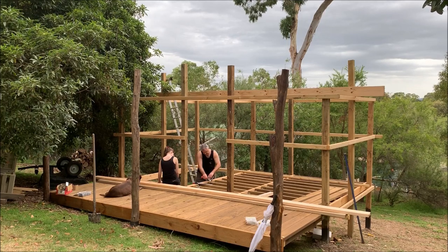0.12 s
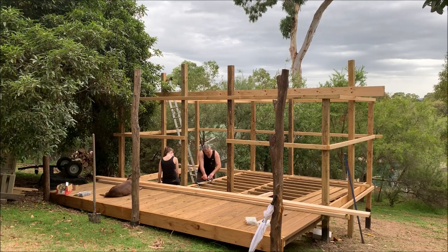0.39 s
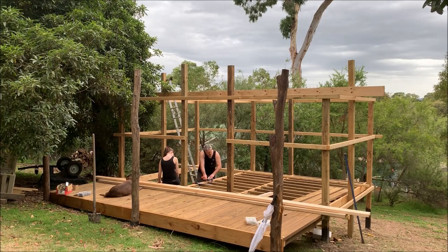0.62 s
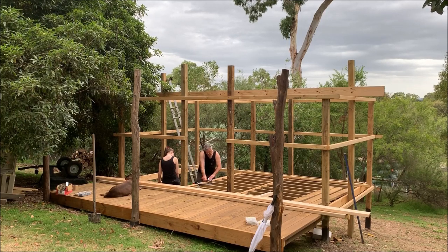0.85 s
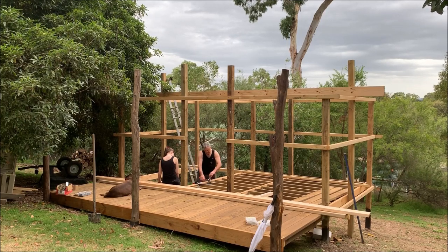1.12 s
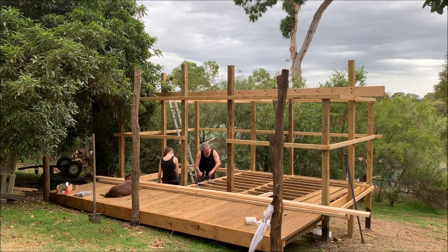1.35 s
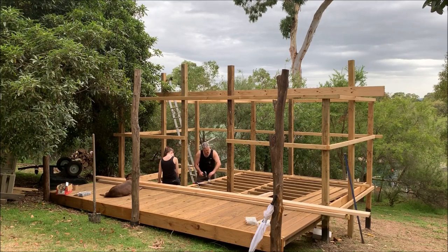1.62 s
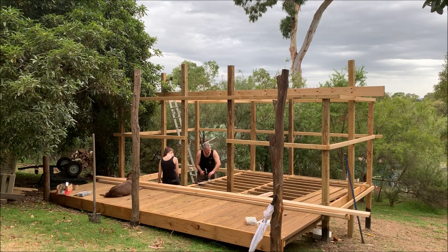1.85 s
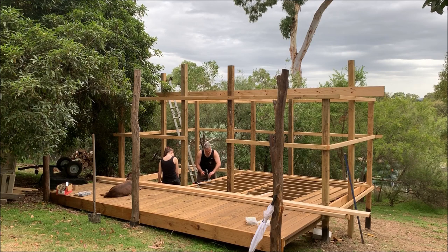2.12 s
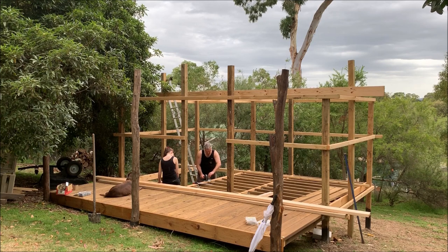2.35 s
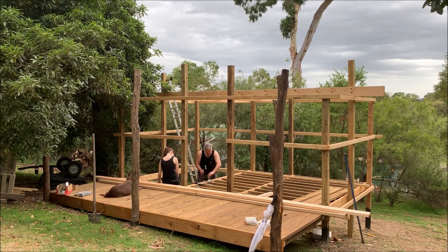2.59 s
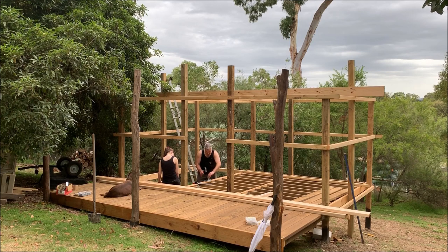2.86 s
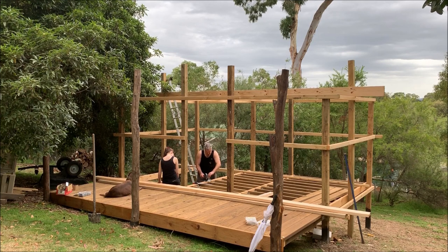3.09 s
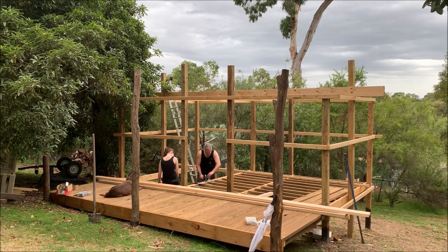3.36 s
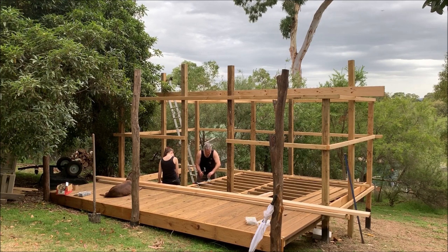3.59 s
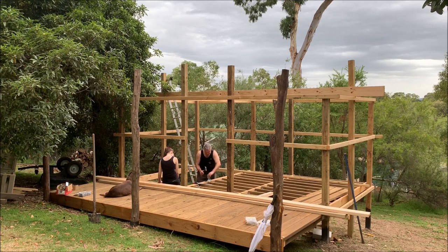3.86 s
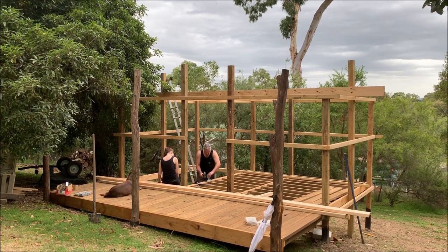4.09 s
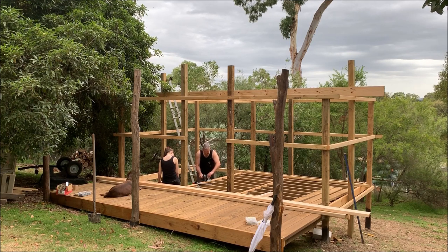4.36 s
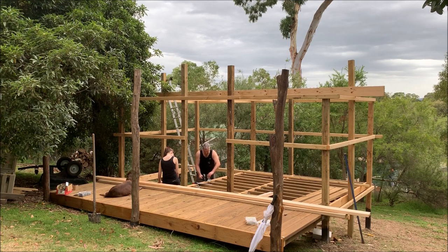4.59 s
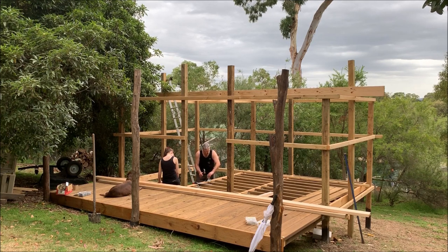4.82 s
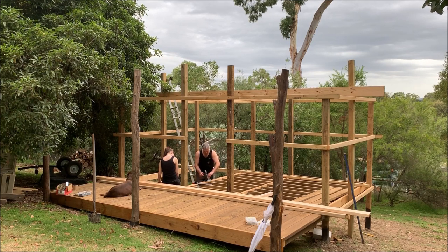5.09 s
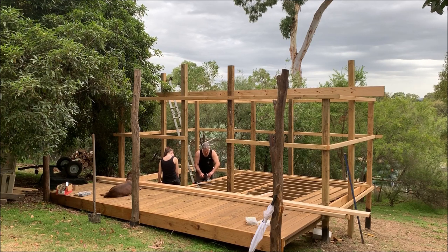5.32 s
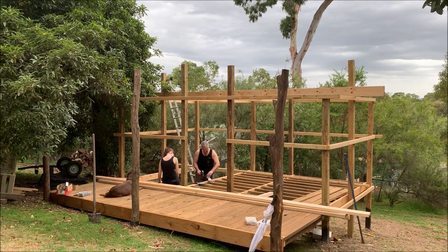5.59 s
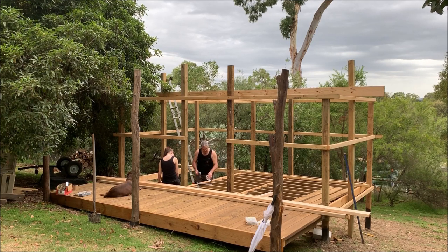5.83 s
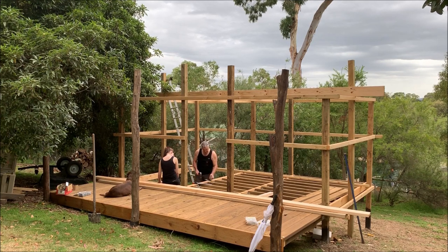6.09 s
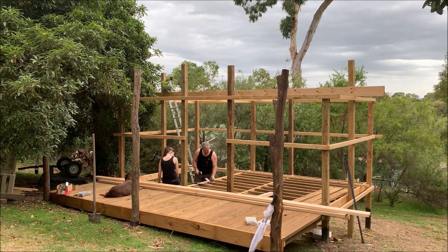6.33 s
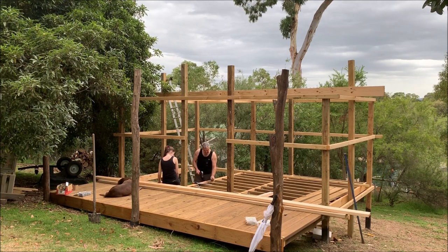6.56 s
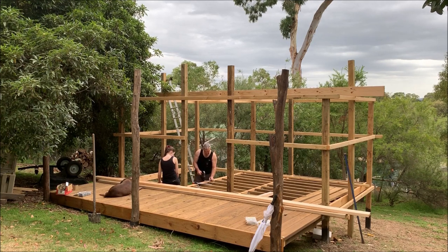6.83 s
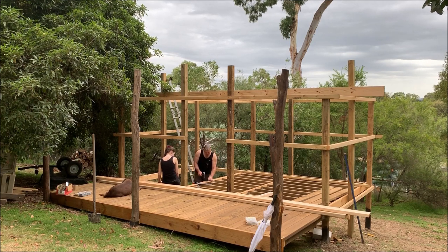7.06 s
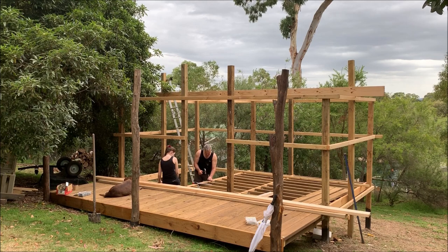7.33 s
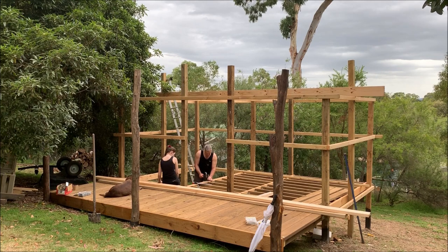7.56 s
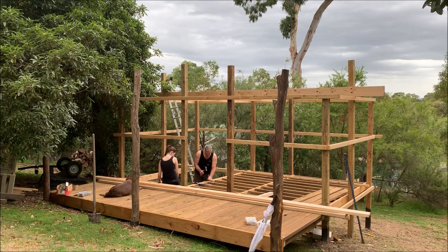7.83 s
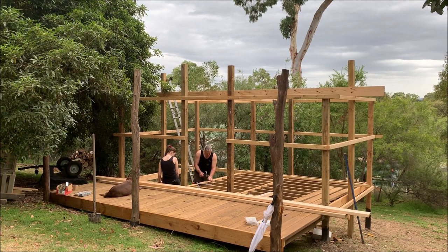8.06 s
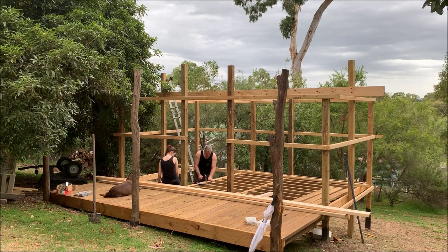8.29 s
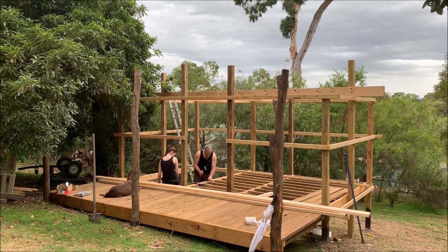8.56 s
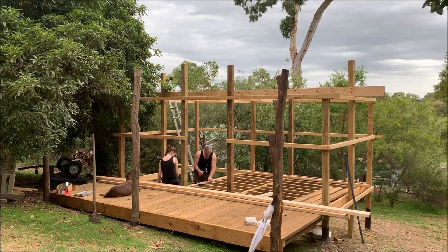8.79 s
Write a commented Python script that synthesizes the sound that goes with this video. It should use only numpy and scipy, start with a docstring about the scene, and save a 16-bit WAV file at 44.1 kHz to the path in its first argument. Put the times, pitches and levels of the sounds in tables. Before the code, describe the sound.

Quiet garden air, then a run of eleven hard hammer blows on a wooden frame, a pause, and four more, over far road noise.

```python
"""Hammering in a garden

A hammer drives nails into floor joists: each blow knocks timber modes, cracks as a short noise burst
and rings steel modes; delayed repeats fill out each strike, decaying noise stands for frame and trees.
A bird chirps in rising harmonic sweeps, a bush cricket buzzes in trains of wing clicks, and far
traffic rumbles and roars as coloured noise. Two microphone ports hear it out of step."""
import sys
import numpy as np
from scipy import signal
from scipy.fft import rfft, irfft, next_fast_len
from scipy.io import wavfile
from scipy.ndimage import uniform_filter1d

SR = 44100
rng = np.random.default_rng(int(sys.argv[2]) if len(sys.argv) > 2 else 0)


def inscribe(sig):
    """Save sig as 16-bit PCM at rate SR to the path in sys.argv[1].

    A 1-D sig is mono; a 2-D sig holds one channel per row.
    Samples are clipped to [-1, 1] before scaling.
    """
    pcm = np.round(np.clip(np.atleast_2d(sig).T, -1, 1) * 32767)
    wavfile.write(sys.argv[1], SR, pcm.astype(np.int16))


def linear_from_db(decibels):
    """Turn decibels (scalar or array-like) into linear amplitude factors; 0 gives 1."""
    return 10 ** (np.asarray(decibels, float) / 20)


N = 393813

# garden air before traffic gain: (frequency [Hz], density [dB per Hz], left-right likeness [0-1])
AIR_NOISE = [(24.06, -98.5, 0.9), (45.5, -80, 1), (74.3, -77, 1), (108.1, -82, 1), (159, -86, .95),
             (273.4, -93.5, 0.9), (550, -94.5, 0.9), (983, -99, 0.9), (1710, -102, 0.9), (2450, -112, 0.2),
             (4270, -121, 0.8), (7000, -127, 0.4), (15080, -133, 0.6)]
# tyres on a far road, before traffic gain: (frequency [Hz], density [dB per Hz])
TYRE_ROAR = [(250, -112), (600, -91), (950, -87), (1500, -102), (2500, -112), (5000, -130)]
# far traffic: (time [s], rumble gain [dB], tyre roar gain [dB])
TRAFFIC_GAIN = [(0, 1.5, -33), (2, 3, -22), (3.5, 6, 0.5), (5, 3, -0.5), (5.75, 6.5, -1.5), (6.3, 2, -8.5),
                (6.85, 1, 0), (7.7, 5, -9.5), (8.93, 4, 3)]
# cricket buzzes outside the regular train: (time [s])
LONE_BUZZES_S = [2.400, 2.742, 8.710]
# cricket wing modes: (frequency [Hz], relative level [dB], t60 [s])
WING_MODES = [(9800, -6, .003), (11800, -2, .003), (13800, -2, .004)]
# rising chirps: (time [s], start frequency [Hz], length [s], level [dB])
CHIRPS = [(0.244, 2700, 0.032, -63), (1.214, 2714, 0.036, -63), (2.224, 2730, .034, -62),
          (2.661, 2240, 0.045, -73.5), (3.726, 2220, .06, -60.5), (5.77, 2670, .036, -61.5),
          (6.679, 2660, 0.037, -59)]
# hammer blows: (time [s], timber knock [dB], steel crack [dB], steel ring [dB], crack tilt [dB per octave])
BLOWS = [(2.077, -15, -21.5, -52, -1), (2.46, -12.5, -21.5, -42, -3.5), (2.801, -13, -24.5, -37, -4),
         (3.131, -11.5, -26, -32, -5), (3.462, -14, -25.5, -52, -3), (3.777, -14, -24.5, -13, -4.5),
         (4.107, -14.5, -23, -37, -4), (4.421, -12, -23.5, -42.5, -2), (4.724, -14, -23.5, -20, -3.5),
         (5.051, -13.5, -24.5, -48.5, -3.5), (5.354, -15, -28, -19, -2.5), (7.704, -14, -21.5, -43, -3),
         (8.058, -14, -25, -35, -4), (8.396, -12.5, -21.5, -39.5, -2.5), (8.774, -11.5, -21.5, -50, -3)]
# hammer head touching a nail lightly: (time [s], crack [dB], ring [dB], ring tilt [dB per octave])
TAPS = [(6.569, -76, -60, -1), (6.700, -86, -51, -7)]
# joists and boards: (frequency [Hz], relative level [dB], t60 [s])
TIMBER_MODES = [(139.9, -21.5, 0.6), (180, -27, .08), (275.7, -22.5, 0.057), (350, -22, 0.065),
                (433, -22, .08), (327, -11, .02), (535.5, 1.5, 0.02), (720, -5, 0.036), (578, -24, 0.071),
                (668, -21.5, 0.21), (792, -25, 0.13), (940, -21, 0.05), (1012, -26, 0.021),
                (1230, -8, 0.019), (1660, -15, 0.011), (2400, -20.5, .01)]
# hammer head and nail: (frequency [Hz], relative level [dB], t60 [s])
STEEL_MODES = [(2400, -8, .08), (2810, -6, .04), (3250, -2, .14), (4300, -5, .05), (5600, -3, .03),
               (6600, -1, .05), (7050, -3, .05), (8200, -2, .025), (10150, -2, .04), (11300, -5, .03)]
# crack spectrum before tilt: (frequency [Hz], gain [dB])
CRACK_GAIN = [(1200, -2.5), (1800, 3), (3000, 2), (4500, 7), (7000, 9.5), (11000, 12.5), (15500, 9.5)]
# delayed repeats of each strike; the one near 4 ms carries the main timber knock:
# (delay [ms], timber gain [dB], steel gain [dB])
REPEATS = [(2.111, -1.5, -2.5), (4.124, 10.5, -7.5), (7.644, -10.5, -8.5), (12.44, -10, -14.5),
           (18.23, -1.5, -13), (24.2, -15, -23), (30.8, -17, -19.5), (41.5, -17, -26), (48.8, -9, -32)]
# scattered sound: (band [Hz], frame level [dB], frame t60 [s], trees level [dB], trees t60 [s],
# left-right likeness [0-1])
SCATTER_BANDS = [(121.6, -39, 0.55, -28.5, 1, 1), (247, -15, .19, -40, 0.84, 0.96),
                 (487, -20.5, 0.17, -41.5, 0.55, 0.94), (970, -11.5, 0.11, -35, 0.68, 0.9),
                 (2117, -19.5, 0.062, -41.5, 0.84, 1), (4006, -22, 0.12, -40.5, 0.67, 0.92),
                 (8700, -36, 0.2, -41, 0.42, 0.8), (13970, -37.5, .09, -45.5, 0.41, 0.6)]
# phase between ports at low frequency: (frequency [Hz], left lead [rad])
PORT_LEAD = [(0, 0), (800, -0.55), (2410, 0.9), (3700, 1.5)]
# level between ports: (frequency [Hz], left minus right [dB])
PORT_LEVEL = [(110, 0.0), (700, -1.5), (1290, 0.0), (2380, -1.5), (4400, 0.0)]

BUZZ_COUNT, FIRST_BUZZ_S, BUZZ_PERIOD_S, BUZZ_DB = 10, .143, .2007, -60
CHIRP_RISE_RATIO, HUSK_DB = 1.46, 4.0
OCTAVE_DB, THIRD_DB, FOURTH_DB = 5, -19, -18  # harmonics
TONE_HZ, TONE_S, TONE_DB = 5070, .024, 4  # level relative to its chirp
# contact width at the average knock; each dB harder multiplies it by exp(-SHORTER_PER_DB)
CONTACT_S, AVERAGE_KNOCK_DB, SHORTER_PER_DB = .00017, -13, 0.41
# higher up, left leads like a time lag that advances in steps
PORT_LAG_S, LAG_FROM_HZ, STEP_RAD = .0002325, 2550, .2
TOP_HZ = 16030


def on_log(hz, points_hz, values):
    """Values joined by straight lines over log frequency."""
    return np.interp(np.log(np.maximum(hz, 1)), np.log(points_hz), values)


def coloured(x, points_hz, gain_db):
    """Zero-phase filter along the last axis by a gain curve."""
    hz = np.fft.rfftfreq(x.shape[-1], 1 / SR)
    return irfft(rfft(x) * linear_from_db(on_log(hz, points_hz, gain_db)), x.shape[-1])


def noise_pair(size, points_hz, likeness):
    """Left and right noise sharing a given part of each frequency."""
    shared = np.clip(on_log(np.fft.rfftfreq(size, 1 / SR), points_hz, likeness), 0, 1)
    mid, side = rfft(rng.standard_normal((2, size)))
    mid = mid * np.sqrt((1 + shared) / 2)
    side = side * np.sqrt((1 - shared) / 2)
    return irfft(mid + np.outer([1, -1], side), size)


def fade(t, t60):
    """Exponential decay, 60 dB in t60."""
    return np.exp(-np.log(1000) * t / t60)


def ring(modes, spread_db, detune, length_s=0.5):
    """One strike on a set of decaying modes, scattered in level and pitch, scaled to unit peak."""
    t = np.arange(int(length_s * SR)) / SR
    hz, db, t60 = np.transpose(modes)[:, :, None]
    level_chance, pitch_chance = rng.standard_normal((2, len(modes), 1))
    tones = np.sin(2 * np.pi * hz * (1 + detune * pitch_chance) * t)
    x = np.sum(linear_from_db(db + spread_db * level_chance) * fade(t, t60) * tones, axis=0)
    return x / np.abs(x).max()


def add(track, s, x):
    """Mix x into the track from second s."""
    i = int(s * SR)
    track[i:i + len(x)] += x[:len(track) - i]


def walk(rate_hz):
    """Random levels held 1 / rate_hz, slewed twice; spread near 1."""
    k = int(SR / rate_hz)
    held = np.repeat(rng.standard_normal(N // k + 1), k)
    return 1.3 * uniform_filter1d(uniform_filter1d(held, k), k)[:N]


def garden():
    """Coloured noise: steady air whose rumble swells, and the tyre roar of far traffic."""
    hz, db, likeness = np.transpose(AIR_NOISE)
    air = coloured(noise_pair(N, hz, likeness), hz, db) * np.sqrt(SR / 2)
    roar = coloured(noise_pair(N, hz, likeness), *np.transpose(TYRE_ROAR)) * np.sqrt(SR / 2)
    s, rumble_db, roar_db = np.transpose(TRAFFIC_GAIN)
    t = np.arange(N) / SR
    rumble = coloured(air, [130, 190], [0, -40])
    rumble_gain = linear_from_db(np.interp(t, s, rumble_db) + 1.5 * walk(7.2))
    roar_gain = linear_from_db(np.interp(t, s, roar_db) + 1.4 * walk(9.1))
    return air - rumble + rumble * rumble_gain + roar * roar_gain


def cricket():
    """Each buzz is a wing stroke of twenty uneven tooth clicks, each ringing the wing modes."""
    out = np.zeros(N)
    train_s = FIRST_BUZZ_S + BUZZ_PERIOD_S * np.arange(BUZZ_COUNT)
    for s in [*train_s, *LONE_BUZZES_S]:
        gap_chance, level_chance = rng.standard_normal((2, 20))
        click_s = np.cumsum(.002 * (1 + .1 * gap_chance))
        for at, chance in zip(click_s, level_chance):
            click = ring(WING_MODES, 2.5, .03, length_s=.006)
            add(out, s + at, linear_from_db(BUZZ_DB + 2.5 * chance) * click)
    return out


def bird():
    """A quick, husky upward sweep with harmonics, followed by a short steady tone near 5 kHz."""
    out = np.zeros(N)
    for s, from_hz, length_s, db in CHIRPS:
        u = np.linspace(0, 1, int(length_s * SR))
        hz = from_hz * (1 + (CHIRP_RISE_RATIO - 1) * np.minimum(1.15 * u, 1))
        phase = 2 * np.pi * np.cumsum(hz) / SR
        voice = np.sin(phase) * (.4 + .9 * u)
        voice += linear_from_db(OCTAVE_DB) * np.sin(2 * phase) * (1 - u ** 2)
        voice += linear_from_db(THIRD_DB) * np.sin(3 * phase) + linear_from_db(FOURTH_DB) * np.sin(4 * phase)
        add(out, s, linear_from_db(db) * voice * np.sin(np.pi * u ** 2) ** 0.12)
    out = out * linear_from_db(HUSK_DB * walk(300))
    t = np.arange(int(TONE_S * SR)) / SR
    tone = np.sin(np.pi * t / TONE_S) ** 0.13 * np.sin(2 * np.pi * TONE_HZ * t)
    for s, _, length_s, db in CHIRPS:
        add(out, s + length_s, linear_from_db(db + TONE_DB) * tone)
    return out


def steel(crack_db, ring_db, tilt_db, ring_tilt_db=0, spread_db=6.0):
    """Steel on steel: a burst of a few milliseconds, and the modal ring of head and nail."""
    t = np.arange(int(.4 * SR)) / SR
    burst = rng.standard_normal(len(t)) * fade(t, .009) * (1 - np.exp(-t / .0002))
    burst[8] += 6.5  # first contact, one sharp click
    hz, db = np.transpose(CRACK_GAIN)
    # shifted while filtered, then trimmed back to its start
    crack = coloured(np.roll(burst, 99), hz, db + tilt_db * np.log2(hz / 8000))[99:len(t) // 4]
    modes = [(f, level + ring_tilt_db * np.log2(f / 3000), t60) for f, level, t60 in STEEL_MODES]
    return linear_from_db(crack_db) * crack, linear_from_db(ring_db) * ring(modes, spread_db, .015)


def timber(knock_db):
    """Joist and board modes smoothed by the contact push; a longer push dulls the knock."""
    t = np.arange(200) / SR
    width_s = CONTACT_S * np.exp(-SHORTER_PER_DB * (knock_db - AVERAGE_KNOCK_DB))
    push = np.exp(-.5 * ((t - 2.93 * width_s) / width_s) ** 2)
    return linear_from_db(knock_db) * np.convolve(ring(TIMBER_MODES, 4.3, 0.01), push / push.sum())


def hammer():
    """Blows and taps: what drives the surroundings, and each strike with its delayed repeats."""
    wood, crack, ping = np.zeros((3, N))
    touches = []
    for s, knock_db, crack_db, ring_db, tilt_db in BLOWS:
        add(wood, s - .0008, timber(knock_db))
        touches.append((s, steel(crack_db, ring_db, tilt_db)))
    for s, crack_db, ring_db, ring_tilt_db in TAPS:
        touches.append((s, steel(crack_db, ring_db, 0, ring_tilt_db, 1)))
    for s, (crack_part, ring_part) in touches:
        add(crack, s, crack_part)
        add(ping, s, ring_part)
    # narrow joists radiate little bass
    wood = signal.sosfilt(signal.butter(3, 250, "high", fs=SR, output="sos"), wood)
    strikes = wood + crack + ping
    for delay_ms, wood_db, steel_db in REPEATS:
        add(strikes, delay_ms / 1000, linear_from_db(wood_db) * wood + linear_from_db(steel_db) * (crack + ping))
    return wood + crack + .3 * ping, strikes


def scatter(frame_db, trees_db, build_s):
    """Noise response of the timber frame and the trees around, each decaying band by band."""
    t = np.arange(SR) / SR
    hz = np.fft.rfftfreq(SR, 1 / SR)
    table = np.array(SCATTER_BANDS)
    noise = rfft(noise_pair(SR, table[:, 0], table[:, 5]))
    out = 0
    for own, (_, near_db, near_t60, far_db, far_t60, _) in zip(np.eye(len(table)), SCATTER_BANDS):
        # neighbouring bands cross-fade, so together they are flat
        band = irfft(noise * on_log(hz, table[:, 0], own), SR)
        frame = linear_from_db(near_db + frame_db) * fade(t, near_t60)
        trees = linear_from_db(far_db + trees_db) * fade(t, far_t60)
        out = out + band * (frame + trees)
    return out * (1 - np.exp(-t / build_s))


def scene():
    """Near blows and cricket, a far bird with more of the trees in it, and the garden air."""
    drive, strikes = hammer()
    buzz, calls = cricket(), bird()
    near = signal.fftconvolve((drive + buzz)[None], scatter(0, 0, 0.0026), axes=1)[:, :N]
    far = signal.fftconvolve(calls[None], scatter(3.0, 11.0, 0.0063), axes=1)[:, :N]
    return strikes + buzz + near + 0.96 * calls + far + garden()


def band_limit(x):
    """A steep low-pass at the top of the band."""
    return signal.sosfilt(signal.butter(12, 16970, fs=SR, output="sos"), x)


def record(dry):
    """Peaks are rounded; the two ports differ in phase and level; top and bottom are cut."""
    size = next_fast_len(N + 4096)
    hz = np.fft.rfftfreq(size, 1 / SR)
    lag_rad = 2 * np.pi * PORT_LAG_S * (hz - LAG_FROM_HZ)
    stepped_rad = lag_rad - STEP_RAD * np.sin(2 * lag_rad)
    lead_rad = np.maximum(np.interp(hz, *np.transpose(PORT_LEAD)), stepped_rad)
    # half the difference on each port
    left = linear_from_db(on_log(hz, *np.transpose(PORT_LEVEL)) / 2) * np.exp(.5j * lead_rad)
    rounded = np.tanh(dry / .55) * 0.57
    ports = irfft(rfft(rounded, size) * np.array([left, 1 / left]), size)[:, :N]
    mix = signal.sosfilt(signal.ellip(8, .2, 60, TOP_HZ, fs=SR, output="sos"), ports)
    mix = signal.sosfilt(signal.butter(2, 40, "high", fs=SR, output="sos"), mix)
    return band_limit(mix)


dry = scene()
out = record(dry)
inscribe(out)
```